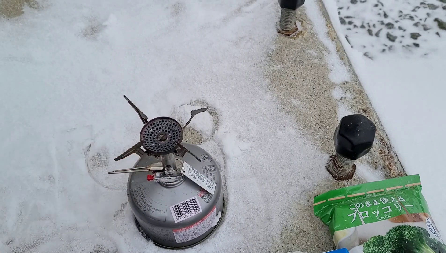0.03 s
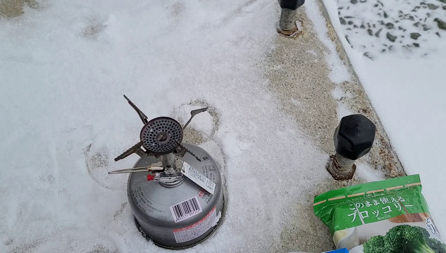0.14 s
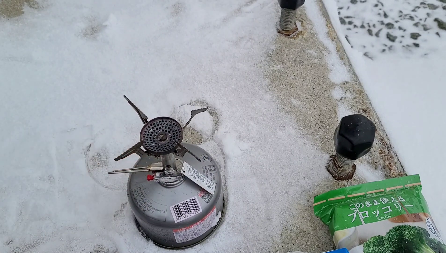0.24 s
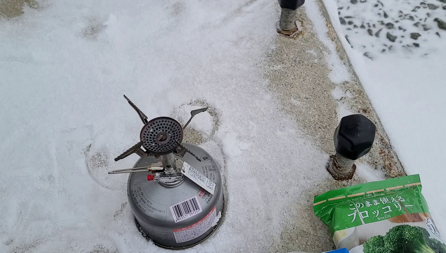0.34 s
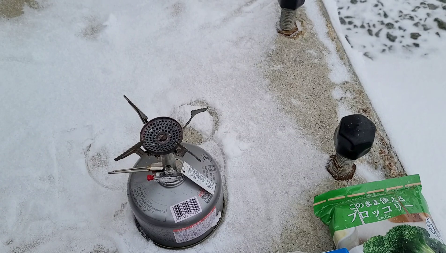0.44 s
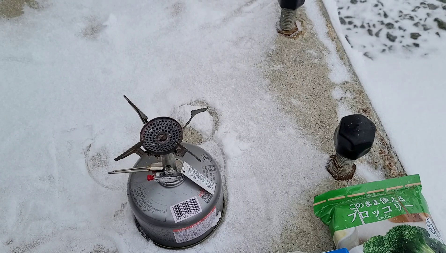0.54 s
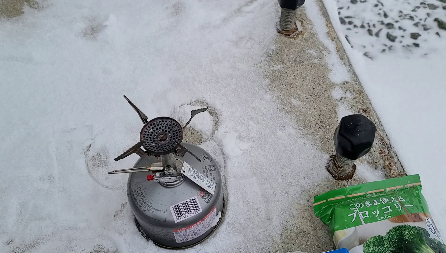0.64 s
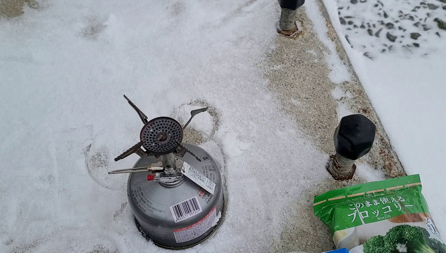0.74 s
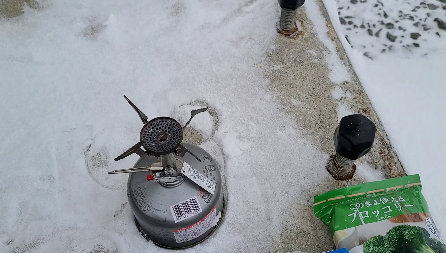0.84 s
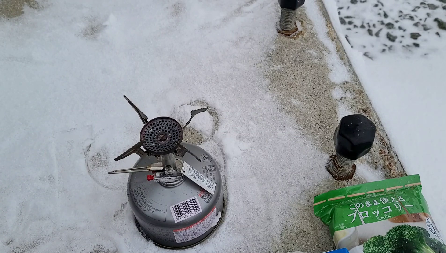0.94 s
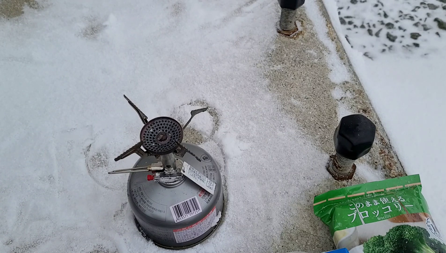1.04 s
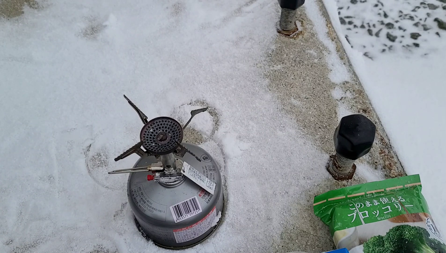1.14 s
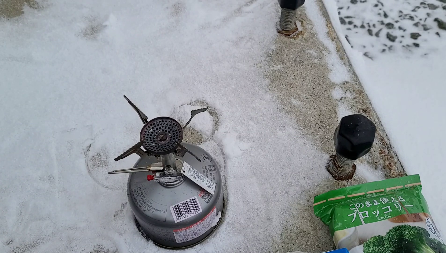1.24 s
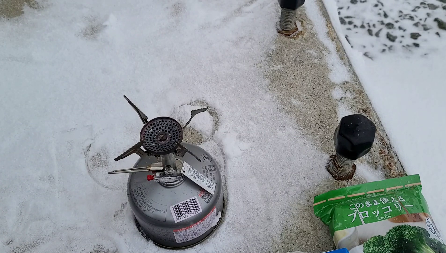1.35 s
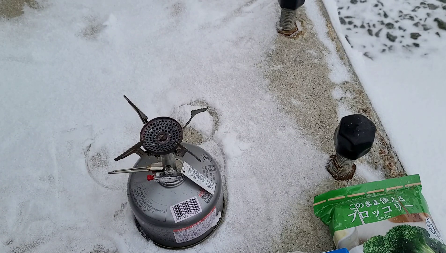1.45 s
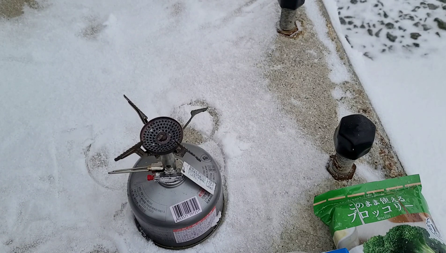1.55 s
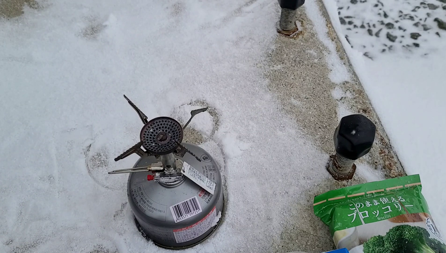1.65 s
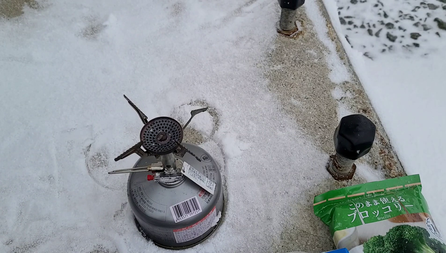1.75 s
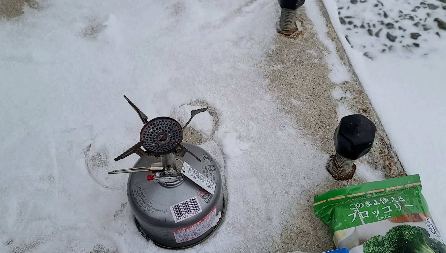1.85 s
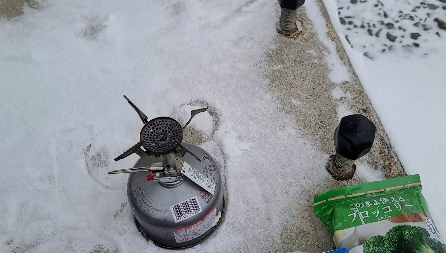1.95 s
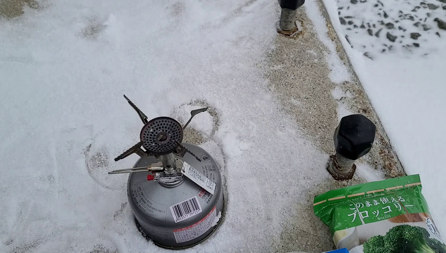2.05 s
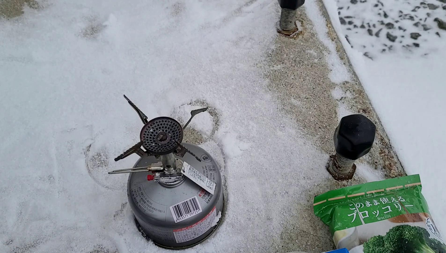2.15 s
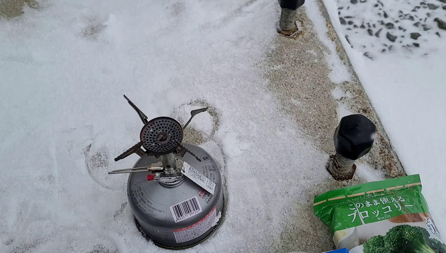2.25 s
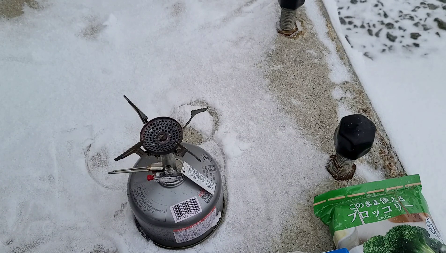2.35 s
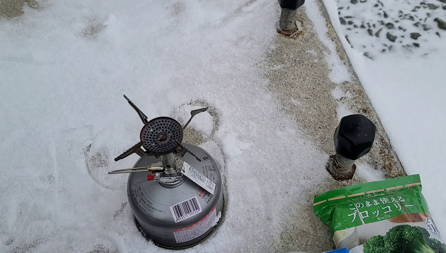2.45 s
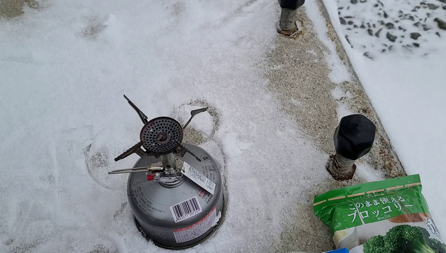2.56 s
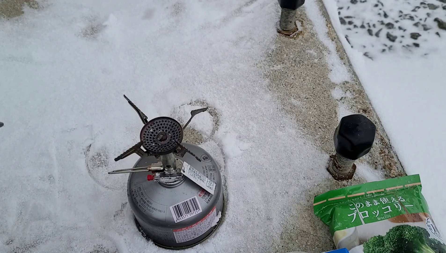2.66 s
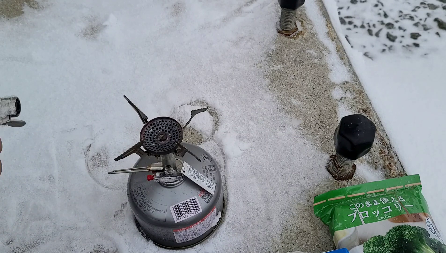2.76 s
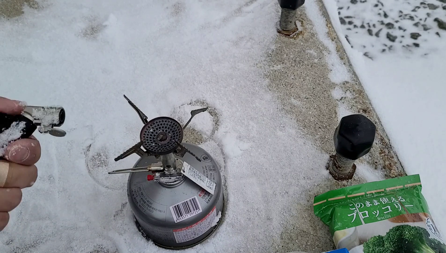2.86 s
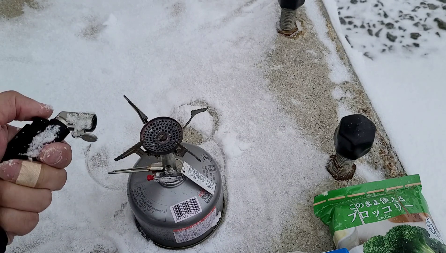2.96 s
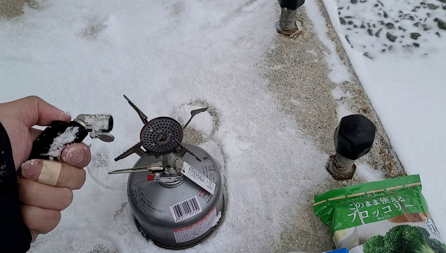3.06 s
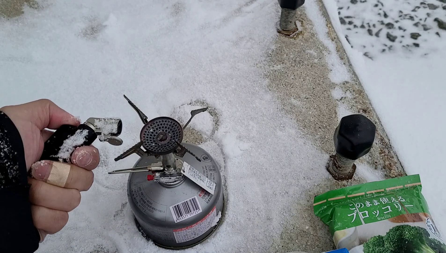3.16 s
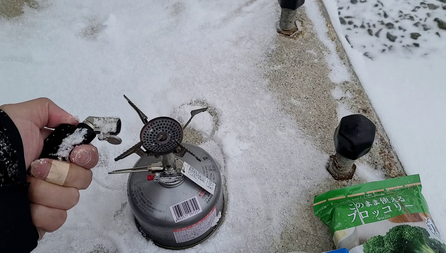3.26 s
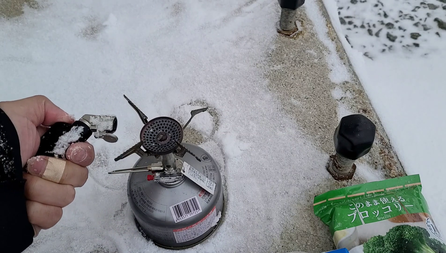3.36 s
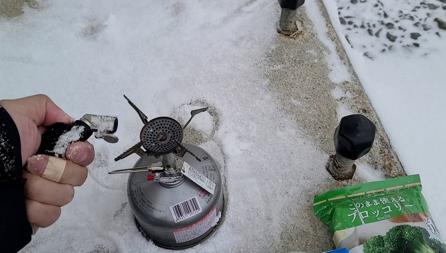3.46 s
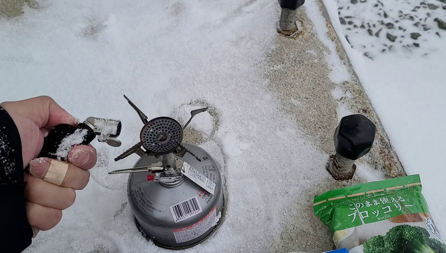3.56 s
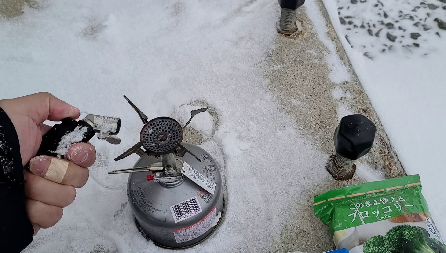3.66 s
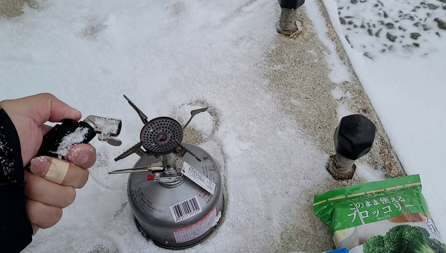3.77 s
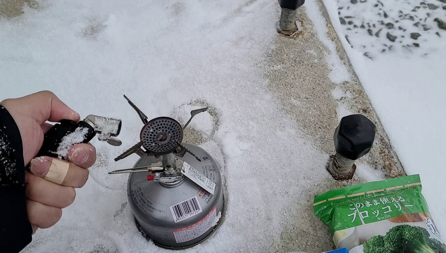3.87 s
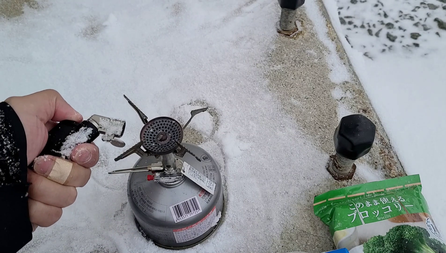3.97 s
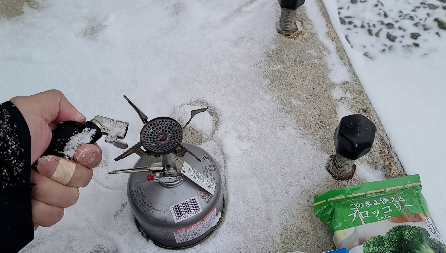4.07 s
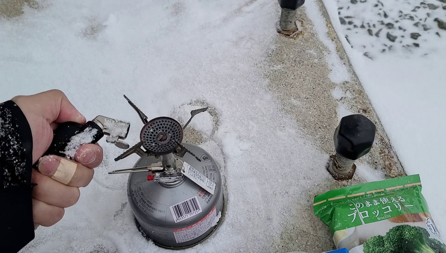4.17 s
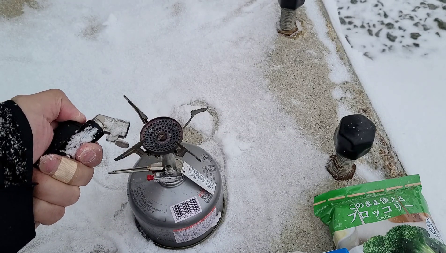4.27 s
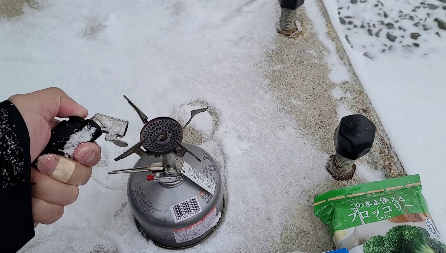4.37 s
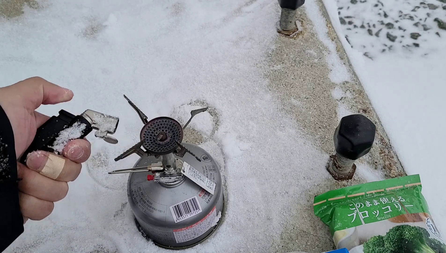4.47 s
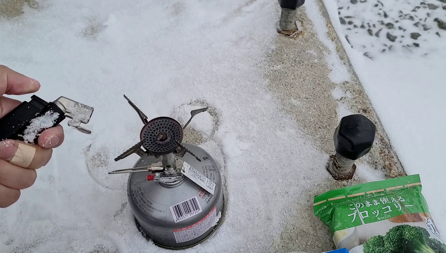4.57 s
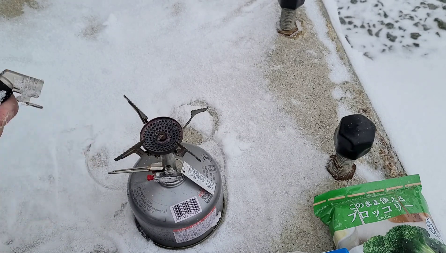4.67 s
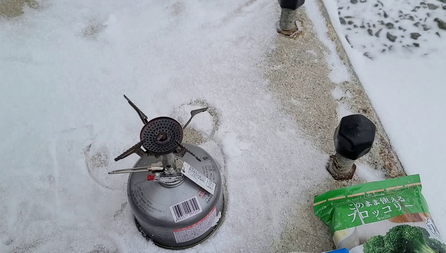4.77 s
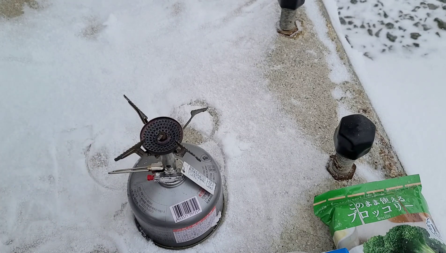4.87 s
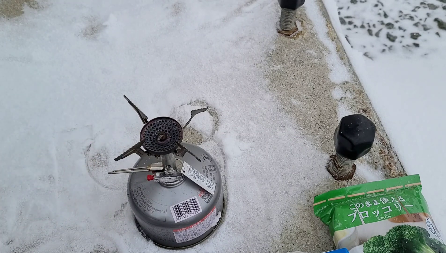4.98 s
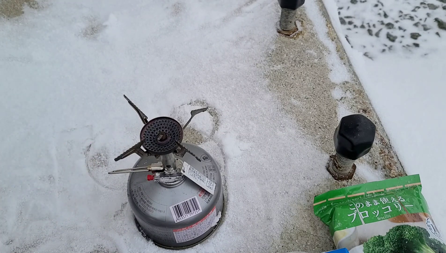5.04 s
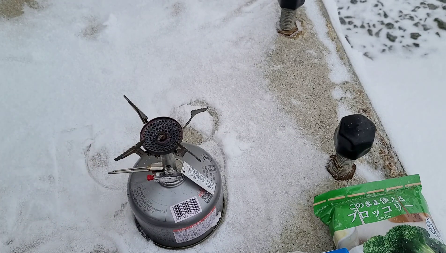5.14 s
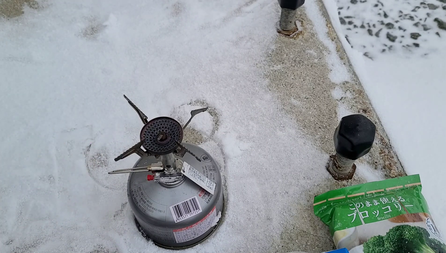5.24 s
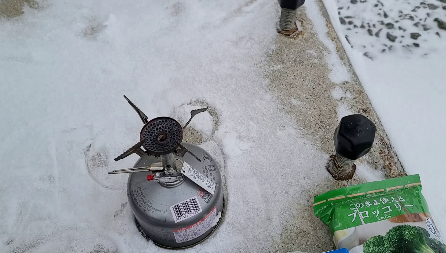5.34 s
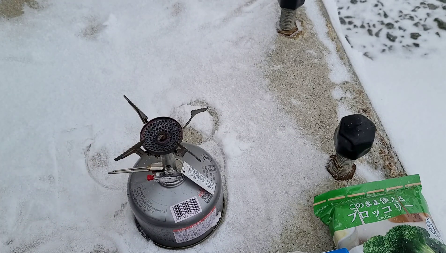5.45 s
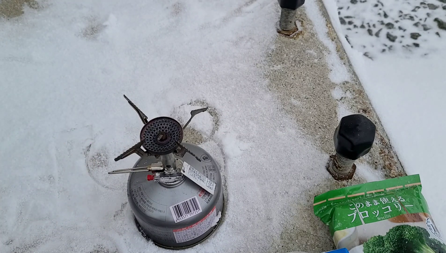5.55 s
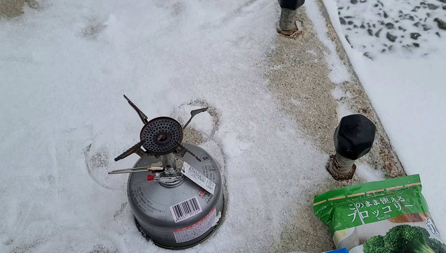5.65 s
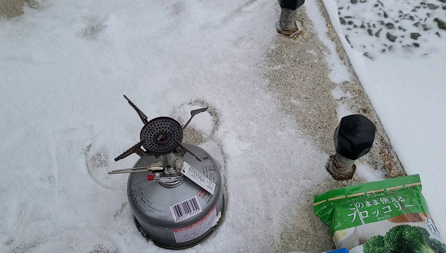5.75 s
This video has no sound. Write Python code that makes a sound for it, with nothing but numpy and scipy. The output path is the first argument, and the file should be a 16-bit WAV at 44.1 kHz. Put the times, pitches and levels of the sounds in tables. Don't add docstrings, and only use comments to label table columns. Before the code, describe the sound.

Steady bright gas hiss with faint snow crunches and ticks, two sharp lighter clicks, a soft whump of ignition, then unsteady rumbling flame.

```python
import sys
import numpy as np
from scipy import signal
from scipy.fft import rfft, irfft
from scipy.io import wavfile
from scipy.ndimage import uniform_filter1d

SR = 44100
rng = np.random.default_rng(int(sys.argv[2]) if len(sys.argv) > 2 else 0)


def decibels_to_gain(level_db):
    exponent = np.asarray(level_db, float) / 20
    return 10 ** exponent


def unload_audio(sound):
    columns = np.transpose(np.atleast_2d(sound))
    steps = np.round(np.clip(columns, -1, 1) * 32767)
    wavfile.write(sys.argv[1], SR, steps.astype(np.int16))


N = 256220
BURST, LEAD = 2048, 512
BURST_HZ = (np.arange(BURST // 2 + 1) + 1) * SR / BURST

# [t/s, peak level/dB, swelling f/Hz, dying f/Hz, rise/s, fall/s]
THUMP = (4.2828, -7.8, 97, 56, .0057, .0072)
IGNITION_S = THUMP[0]


def gas(t):
    # [f/Hz, level/dB per Hz]
    head = [(1180, -49), (2000, -19), (2310, -16), (2790, -16), (3410, -3), (3800, -5), (4310, 0),
            (4620, -3), (5170, -21), (5750, -18), (6300, -10), (6850, -15), (7400, -9), (7990, -20),
            (9000, -21), (11700, -51), (19800, -120)]
    # [f/Hz, level/dB per Hz]
    air = [(5000, -34), (8500, -7), (9690, -11), (11400, 0), (12600, -6), (14900, -5), (15500, -9)]
    valve_s, valve_turn_s, valve_db = 1.9, .24, -3.2
    cloth_treble_db, cloth_fade_s = 3.5, .2
    lit = t > IGNITION_S - .03
    turned = np.clip((t - valve_s) / valve_turn_s + .5, 0, 1)
    body_db = -49.4 - .6 * t + valve_db * turned - 6.3 * lit
    air_db = -60.4 - 1.1 * t - 3.6 * lit + cloth_treble_db * np.exp(-t / cloth_fade_s)
    body = rush(head, body_db, patchy_db=1.2, patch_s=.03, patch_hz=900)
    return body + rush(air, air_db, patchy_db=.8, patch_s=.03, patch_hz=2500)


def flame(t):
    # [f/Hz, level/dB per Hz]
    roar_colour = [(24, -41), (40, -8), (78, -2), (205, 0), (356, -10), (422, -10), (554, -22), (600, -19),
                   (780, -49), (1320, -120)]
    # [f/Hz, level/dB per Hz]
    rasp_colour = [(290, -31), (500, -1), (557, -7), (629, -2), (961, -1), (1210, -3), (1500, -19),
                   (1870, -9), (2700, -21), (3680, -25), (4740, -24), (6110, -28), (6900, -40), (7600, -33),
                   (9000, -37), (11700, -66), (19800, -120)]
    # [t/s, swell or lull/dB]
    flutters = [(4.43, 4), (4.49, -3), (4.63, -4), (4.865, 3.5), (4.96, 2.5), (5.09, -3), (5.14, 4),
                (5.19, -3), (5.27, 3), (5.59, -3), (5.64, 1.5)]
    after = t - IGNITION_S
    lit = np.clip((after + .028) / .022, 0, 1)
    roar_db = -43.3 + 2 * np.minimum(after, 1)
    roar_db = roar_db + 3 * np.exp(-np.abs(after) / .03)
    roar_db = roar_db + swells(flutters, t, length_s=.022)
    flare_late_s, flare_s = .13, .09
    rasp_db = -50.6 - .5 * after + 3.5 * np.exp(-((after - flare_late_s) / flare_s) ** 2)
    roar = rush(roar_colour, roar_db, patchy_db=2.2, patch_s=.03, patch_hz=60, size=2048)
    rasp = rush(rasp_colour, rasp_db, patchy_db=1.2, patch_s=.012, patch_hz=1200, pop_db=1.1, size=2048)
    return lit * (roar + rasp) + ignition(after)


def ignition(after):
    # [t/s, peak level/dB, rise/ms, decay/ms]
    front = (4.2795, -27, 2.4, 2.6)
    # [f/Hz, level/dB]
    puff_colour = [(300, -22), (600, -9), (800, 2), (980, -9), (1170, -2), (1450, -20), (1900, -16),
                   (3300, -21)]
    _, db, early_hz, late_hz, rise_s, fall_s = THUMP
    swell = np.exp(np.where(after < 0, -(after / rise_s) ** 2 / 2, -after / fall_s))
    turn = 2 * np.pi * np.where(after < 0, early_hz, late_hz) * after
    thump = decibels_to_gain(db - .8) * swell * (np.cos(turn) + .14 * np.cos(2 * turn + .8))
    puff_s, puff_db, rise_ms, decay_ms = front
    shade_db = read(puff_colour, BURST_HZ, log=True) - 25 * (BURST_HZ > 3600)
    puff = np.zeros((2, N))
    add(puff, puff_s, puff_db, shade_db, rise_ms / 2, decay_ms, like=.8, aside=0)
    return puff + np.array([thump, .9 * np.roll(thump, shift=12)])


def lighter():
    # [t/s, peak level/dB]
    snaps = [
        (3.483, -8),
        (4.2328, -5.5),
        (5.2864, -8.5),
    ]
    # [f/Hz, left level/dB, right level/dB]
    snap_colours = [
        [(640, -21, -15), (830, -31, -25), (1050, -15, -11), (1400, -10, -4), (1750, -16, -11), (2000, -8, -13),
         (3270, -7, -8), (5170, -13, -14), (6000, -2, -2), (7300, -6, -8), (8350, -17, -8), (9910, -9, -13),
         (14860, -9, -15)],
        [(280, -9, -13), (860, -13, -27), (1210, -12, -8), (1490, -16, -18), (1870, -1, -11), (2650, -3, -5),
         (4010, -20, -25), (4820, -4, -11), (5530, -15, -13), (6300, -8, -4), (7520, -13, -15), (10900, -4, -9),
         (15120, -16, -17)],
        [(350, -5, -20), (670, -8, -27), (1250, -1, -8), (1650, -7, -17), (1830, -11, -5), (2350, -6, 2),
         (3660, -11, -8), (4440, -6, -18), (6650, -2, -7), (7620, -11, -17), (9930, -6, -18), (11110, -1, -10),
         (14880, -4, -12)],
    ]
    out = np.zeros((2, N))
    for (s, db), colour in zip(snaps, snap_colours):
        shade_db = np.where(BURST_HZ < 250, -45, read(colour, BURST_HZ, log=True))
        shade_db = shade_db - 13 * np.maximum(BURST_HZ - 15300, 0) / 1000
        add(out, s, db - 16, shade_db, rise_ms=3.5, decay_ms=4.5, like=.6)
        add(out, s + .0008, db + .4, shade_db, rise_ms=.3, decay_ms=1.1, like=.55)
        add(out, s + .0098, db - 23, shade_db, rise_ms=.8, decay_ms=3.6, like=.6)
    return out


def hump(hz, octaves):
    return decibels_to_gain(np.maximum(-6 * (np.log2(BURST_HZ / hz) / octaves) ** 2, -60))


def sides(gain, pan_db):
    return 20 * np.log10(gain) + np.array([[pan_db], [-pan_db]]) / 2


def ticks():
    # [t/s, peak level/dB, f/Hz, left minus right/dB, high ring level/dB]
    tick_table = [(0.0553, -28, 2140, 6.5, -2), (0.0897, -26, 2620, 5.0, -12),
                  (0.1386, -32, 2640, 5.0, -16), (0.2897, -30, 2910, 6.5, -8), (1.953, -25, 2400, 7.0, -2),
                  (2.0009, -36, 4190, 5.0, -3), (2.8484, -38, 2600, 5.5, -7), (3.1692, -36, 2200, 3.0, -9),
                  (3.5134, -35, 1800, 2.0, -10), (3.5175, -37, 1900, 2.0, -7), (3.691, -29, 6000, 4.0, 0),
                  (4.2632, -37, 1900, 2.0, -6), (4.4538, -25, 4800, 3.5, -1), (4.8369, -33, 2300, 4.0, -24),
                  (4.976, -46, 7000, 4, 0), (4.995, -40, 2800, 5.5, -4), (5.3164, -41, 2800, 3.5, -3),
                  (5.3403, -42, 3500, 3.0, -3)]
    out = np.zeros((2, N))
    for s, db, centre_hz, pan_db, ring_db in tick_table:
        gain = hump(centre_hz, octaves=.45) + decibels_to_gain(ring_db) * hump(6800, octaves=.85)
        colour_db = sides(gain, pan_db)
        add(out, s + .0006, db - .8, colour_db, rise_ms=.3, decay_ms=.7, like=.76, aside=.8)
    return out


def crunches():
    # [t/s, peak level/dB, f/Hz, left minus right/dB]
    crunch_table = [(0.02, -40, 420, 3), (0.223, -44, 1900, 5.0), (0.236, -45, 1700, 5),
                    (0.25, -37, 1140, 7.0), (0.279, -40, 697, 4.5), (0.693, -47, 732, 2.5),
                    (0.366, -38, 657, 2.0), (1.812, -46, 748, 2.5), (1.82, -39, 1250, 2.5),
                    (2.04, -47, 1200, 2), (2.055, -41, 1260, 1.5), (2.189, -44, 1150, 3.5),
                    (2.377, -46, 1000, 3.0), (2.408, -44, 654, 4.5), (2.473, -43, 678, 3.5),
                    (2.494, -47, 864, 3.5), (2.528, -49, 1010, 2.0), (2.576, -47, 789, 2.5),
                    (1.565, -47, 1100, 3), (2.72, -44, 1140, 2.0), (2.745, -45, 775, 0.0),
                    (2.781, -42, 1690, 3.0), (2.848, -45, 1300, 3.0), (3.16, -43, 1600, 4.5),
                    (3.174, -46, 900, 3), (3.691, -44, 1270, 1.0), (4.067, -50, 821, 3.0),
                    (4.262, -41, 450, 0.0), (4.27, -42, 1900, 0.0), (4.836, -39, 1400, 4.5)]
    octaves, crumb_db, crumb_ms = .7, -8, 14
    out = np.zeros((2, N))
    for s, db, centre_hz, pan_db in crunch_table:
        colour_db = sides(hump(centre_hz, octaves), pan_db)
        add(out, s + .0006, db + 1.2, colour_db, rise_ms=.3, decay_ms=1.1, like=.76, aside=.35)
        late, pitch = rng.random(size=2)
        crumb_s = s + crumb_ms * (.3 + late) / 1000
        colour_db = sides(hump(centre_hz * (.7 + pitch), octaves), pan_db)
        add(out, crumb_s, db + crumb_db, colour_db, rise_ms=.4, decay_ms=1.6, like=.6, aside=.35)
    return out


def surroundings(t):
    # [f/Hz, level/dB per Hz]
    rumble_colour = [(12, -40), (28, -7), (65, 1.5), (82, -3), (103, -12), (140, -13), (180, -43),
                     (310, -120)]
    # [t/s, swell/dB]
    gust_table = [(.01, 7), (.13, 7), (.32, 4), (.7, 4), (.95, 5), (1.1, 7), (1.25, 5), (1.4, 8), (1.53, 6),
                  (1.97, 8), (2.14, 7), (2.3, 4), (2.43, 6), (2.85, 7), (3.08, 3), (3.34, 6), (3.65, 5),
                  (3.93, 7), (4.31, 15)]
    # [f/Hz, level/dB per Hz]
    drone_colour = [(65, -32), (110, -2), (173, -2), (237, -11), (270, -8), (380, -9), (490, -39),
                    (840, -120)]
    # [f/Hz, level/dB per Hz]
    rustle_colour = [(210, -32), (350, -2), (408, -1), (762, -4), (960, -9), (1170, -5), (1500, -9),
                     (1750, -8), (2700, -8), (3510, -38), (5940, -120)]
    # [t/s, rustle level/dB]
    effort = [(0.0, -54), (.15, -54), (.32, -60), (.55, -62), (1.6, -62.5), (2.0, -60), (2.3, -62),
              (3.0, -64), (4.2, -65)]
    effort_db = read(effort, t)[0]
    gust_db = -56.5 + swells(gust_table, t, length_s=.04)
    drone_db = -62 + (effort_db + 65) / 2
    rustle_db = effort_db + 1.4 - 4.5 * (t > IGNITION_S)
    gusts = rush(rumble_colour, gust_db, patchy_db=1.5, patch_s=.1, patch_hz=30, size=4096)
    drone = rush(drone_colour, drone_db, patchy_db=1.5, patch_s=.05, patch_hz=60, size=2048)
    rustle = rush(rustle_colour, rustle_db, patchy_db=1.5, patch_s=.015, patch_hz=700, pop_db=2, size=1024)
    return gusts + drone + rustle


def rush(colour, db, patchy_db, patch_s, patch_hz, pop_db=0, size=512):
    pops = np.repeat(rng.exponential(size=N // 40 + 1).clip(0, 5), 40)[:N]
    white = rng.standard_normal(size=(2, N)) * decibels_to_gain(pop_db * pops)
    hz, s, noise = signal.stft(white, SR, nperseg=size)
    hz = hz + 1
    field = rng.standard_normal(noise[0].shape)
    field = uniform_filter1d(field, 1 + int(patch_hz / hz[1]), axis=0)
    field = uniform_filter1d(field, 1 + int(patch_s / s[1]), axis=1)
    shade_db = read(colour, hz, log=True)[0] + np.where(hz > colour[-1][0], -60, 0)
    both = ports(hz, noise) * decibels_to_gain(shade_db[:, None] + patchy_db * field / field.std())
    out = signal.istft(both, SR, nperseg=size)[1][:, :N]
    return out / out.mean(axis=0).std() * decibels_to_gain(db)


def ports(hz, scatter):
    # [f/Hz, left minus right/dB, left lead/rad, likeness/0-1]
    shading = [(40, .7, 0, .95), (200, 1.2, 0, .99), (600, 2, .3, .9), (1400, 1, .5, .4), (2800, 2, 0, .7),
               (3500, 6, 0, .85), (4400, 9, -.3, .85), (5300, 3, -.5, .6), (6400, 8, -.8, .7),
               (7000, 3, -1.5, .6), (7800, 2, -3, .7), (9000, 2, 0, .5), (11500, 7, 0, .7),
               (13000, 10, -.8, .6), (14500, 4, -1.8, .6)]
    pan_db, lead, like = read(shading, hz, log=True)[:, :, None]
    like = np.clip(like, 0, 1)
    left, right = decibels_to_gain(pan_db / 2), decibels_to_gain(-pan_db / 2)
    one, other = scatter
    far = (like * one + np.sqrt(1 - like ** 2) * other) * np.exp(-1j * lead)
    mean = np.sqrt(left ** 2 + right ** 2 + 2 * left * right * like * np.cos(lead))
    return np.array([one * left, far * right]) / mean


def add(out, s, db, colour_db, rise_ms, decay_ms, like, aside=1):
    # [t/s, right port
    # delay/ms]
    hand = [(2.3, .08), (2.85, .33), (3.1, .115), (4.55, .11), (4.8, .38), (5.3, .48)]
    ms = (np.arange(BURST) - LEAD) / SR * 1000
    shape = np.exp(np.where(ms < 0, ms / rise_ms, -ms / decay_ms))
    one, other = rfft(rng.standard_normal(size=(2, BURST)) * shape)
    late_s = aside * read(hand, s)[0] / 1000
    far = (like * one + (1 - like) * other) * np.exp(-2j * np.pi * BURST_HZ * late_s)
    both = np.array([one, far])
    both = both / uniform_filter1d(np.abs(both), size=35, axis=1)
    burst = irfft(both * ringing(colour_db))
    start = int(s * SR) - LEAD
    out[:, start:start + BURST] += burst / np.abs(burst.mean(axis=0)).max() * decibels_to_gain(db)


def ringing(colour_db):
    cepstrum = irfft(np.log(decibels_to_gain(colour_db)))
    cepstrum[..., 1:BURST // 2] *= 2
    cepstrum[..., BURST // 2 + 1:] = 0
    return np.exp(rfft(cepstrum))


def swells(table, t, length_s):
    s, db = np.transpose(table)[:, :, None]
    return (db * np.exp(-((t - s) / length_s) ** 2 / 2)).sum(axis=0)


def read(table, x, log=False):
    at, *columns = np.transpose(table)
    bend = np.log if log else np.asarray
    return np.array([np.interp(bend(x), bend(at), c) for c in columns])


def scene():
    t = np.arange(N) / SR
    return gas(t) + flame(t) + lighter() + ticks() + crunches() + surroundings(t)


def low_pass(x):
    return signal.sosfilt(signal.butter(12, 16650, fs=SR, output="sos"), x)


def record(dry):
    cut = signal.ellip(10, .2, 70, 16500, fs=SR, output="sos")
    return low_pass(signal.sosfilt(cut, dry))


dry = scene()
out = record(dry)
unload_audio(out)
```